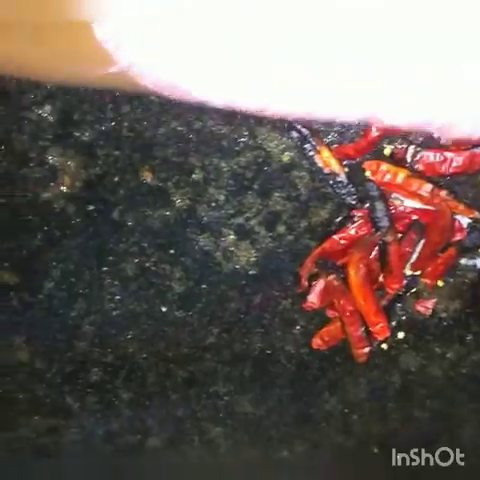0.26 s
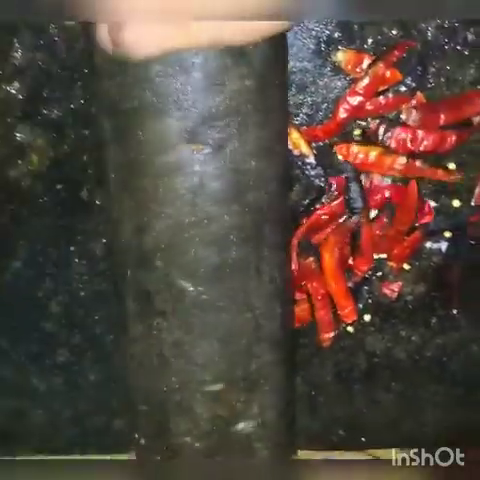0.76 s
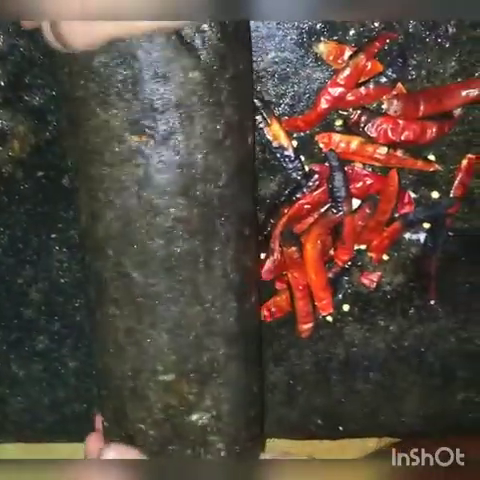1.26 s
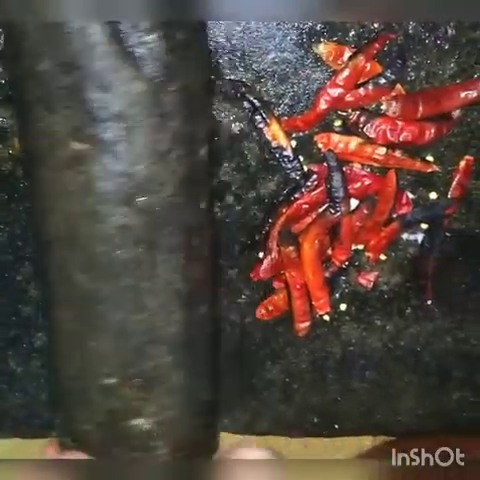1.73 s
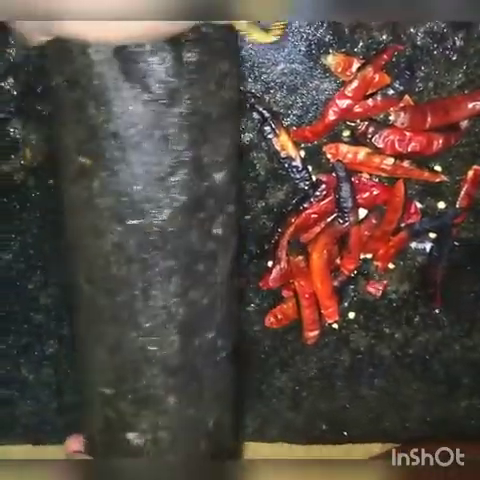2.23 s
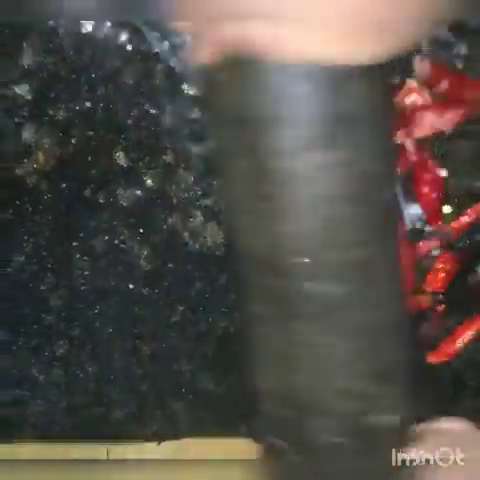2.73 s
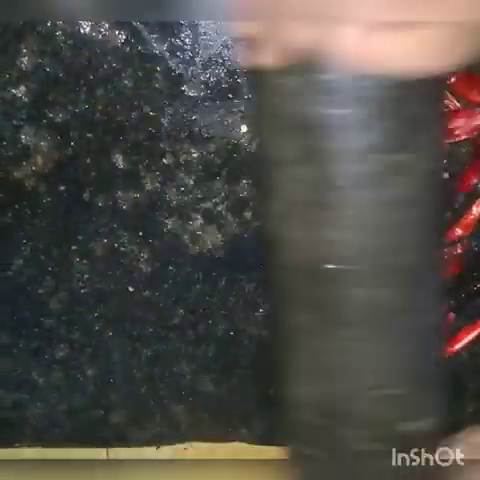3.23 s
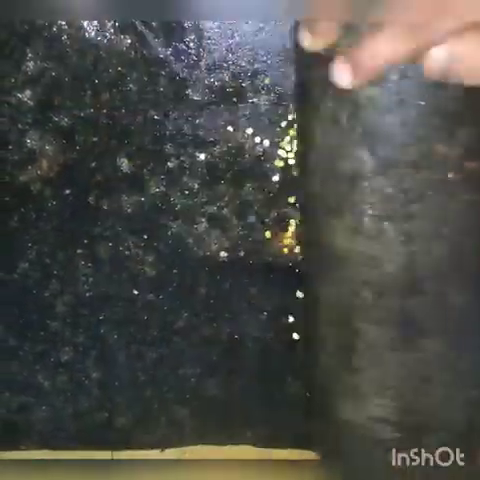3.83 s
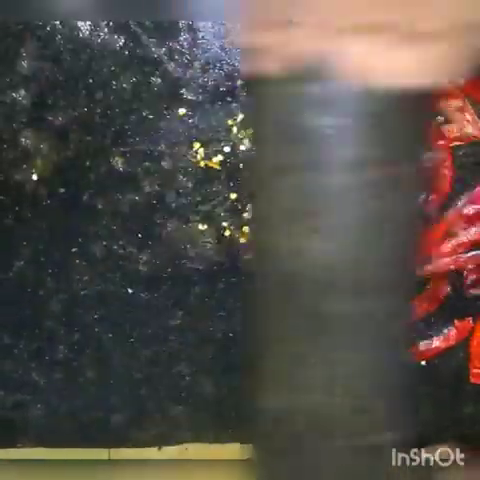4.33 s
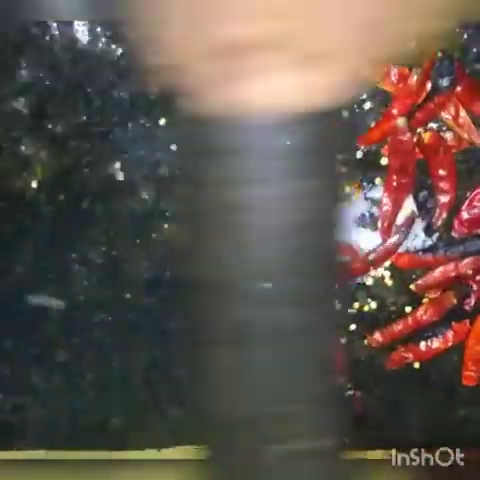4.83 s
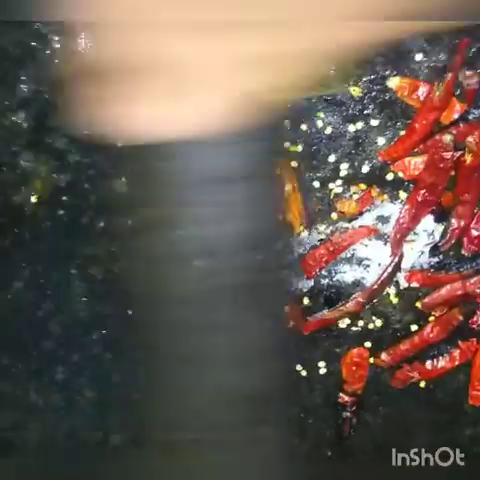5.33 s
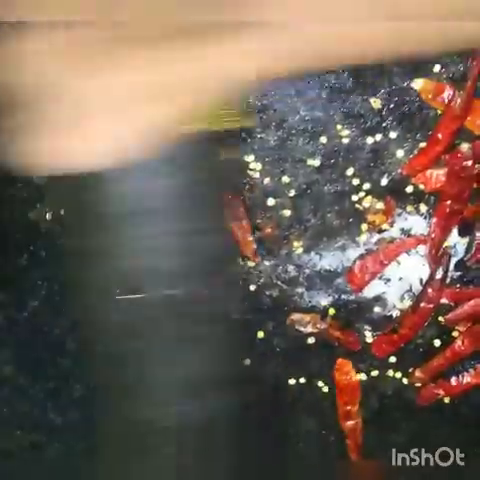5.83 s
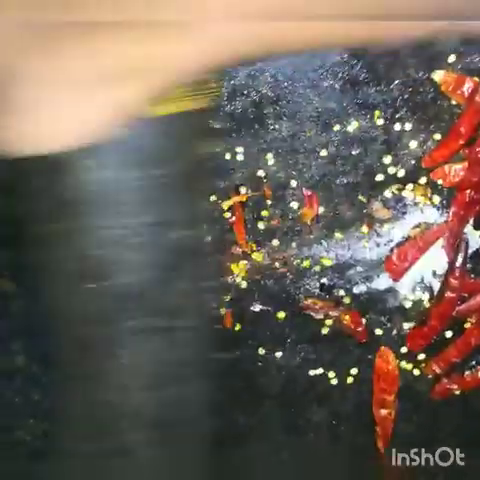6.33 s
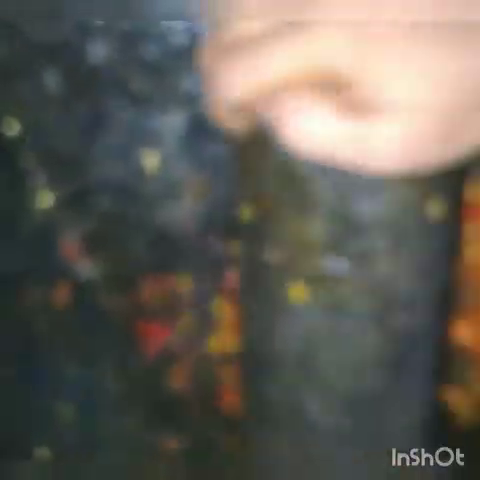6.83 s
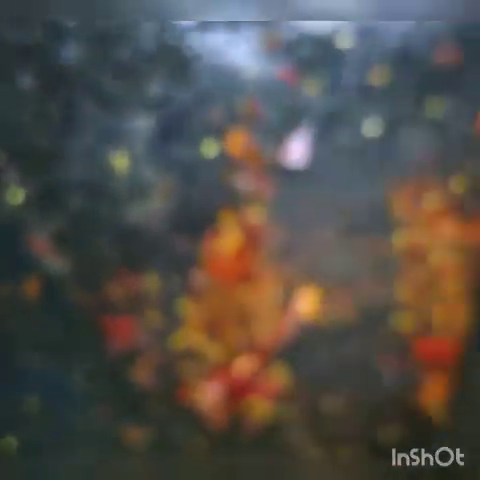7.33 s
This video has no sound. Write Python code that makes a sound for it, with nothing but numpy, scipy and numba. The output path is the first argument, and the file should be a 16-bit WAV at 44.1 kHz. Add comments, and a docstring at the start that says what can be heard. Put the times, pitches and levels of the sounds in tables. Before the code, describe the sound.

Very close stereo microphones in a small kitchen. A stone roller first rattles and rolls lightly on a stone slab, pauses with a few small knocks, then is pushed to and fro over dried chillies: dry crunchy swishes, low rumbles and solid stone knocks about twice a second. Pods snap faintly and a crumb taps on the right. The strokes soften near the end. Crickets trill behind, over quiet room tone.

```python
"""A stone roller is pushed to and fro over dried chillies and salt on a stone slab in a small kitchen.
Close to the two microphones it rumbles (random bumps through a gliding resonance) and knocks (blows through
the modes of slab and stone). Dry swishes of the strokes are coloured noise that swells with their speed.
Pods snap in short noise bursts, stone squeaks faintly, and one crumb taps the right microphone.
Behind them are a quiet room tone and crickets singing outside, made of trilled narrow noise."""
import sys
import numpy as np
from scipy import signal
from scipy.fft import rfft, irfft, next_fast_len
from scipy.io import wavfile
from scipy.ndimage import uniform_filter1d
from numba import njit

SR = 44100
rng = np.random.default_rng(int(sys.argv[2]) if len(sys.argv) > 2 else 0)


def generate_wav(signal):
    """Clip the signal to [-1, 1] and save it as 16-bit WAV at the path in sys.argv[1]."""
    frames = np.transpose(np.atleast_2d(signal))
    scaled = np.clip(frames, -1, 1) * 32767
    pcm = np.round(scaled).astype(np.int16)
    wavfile.write(sys.argv[1], SR, pcm)


N = 334719
TIME = np.arange(N) / SR
RING_TIME = TIME[:SR * 3 // 4]   # long enough for any response
SLOW_TIME = TIME[::64]           # steps of the slow controls


def from_db(db):
    """Decibels to gain."""
    return 10 ** (np.asarray(db) / 20)


def rms_one(x):
    """Scale to rms 1."""
    return x / np.sqrt(np.mean(x ** 2) + 1e-20)


def unit_energy(x):
    """Scale a response so that it passes white noise at the same power."""
    return rms_one(x) / np.sqrt(x.shape[-1])


def at_hz(points, hz):
    """Read a table on a log-frequency axis."""
    f, value = np.transpose(points)
    return np.interp(np.log(hz + 1e-3), np.log(f), value)


def band(x, low_hz, high_hz, order=2):
    """Causal band-pass."""
    sections = signal.butter(order, [low_hz, min(high_hz, .45 * SR)], "band", fs=SR, output="sos")
    return signal.sosfilt(sections, x + 1e-18)


def drift(rate):
    """Slow chance with a spread of about 1, from random knots joined at a rate per second."""
    knots = rng.standard_normal(4000)
    return np.interp(TIME * rate, np.arange(len(knots)), knots)


def at_audio_rate(control):
    """Join the steps of a slow control by straight lines."""
    return np.interp(TIME, SLOW_TIME, control)


def swell(s, length_s):
    """A rounded rise and fall around a moment."""
    return at_audio_rate(np.cos(np.pi * np.clip((SLOW_TIME - s) / length_s, -.5, .5)))


def together(shapes, level_db, floor_db):
    """Gain curve of overlapping moves, each at its own level, over a floor; powers add."""
    moves = np.sum((shapes * from_db(level_db)) ** 2, axis=0)
    return at_audio_rate(np.sqrt(moves + from_db(floor_db) ** 2))


def stereo_noise(gain_at, likeness, size=N):
    """Two channels of noise with a given colour and left-right likeness; rms 1."""
    padded = next_fast_len(size, True)
    hz = np.fft.rfftfreq(padded, 1 / SR)
    mid, side = rfft(rng.standard_normal((2, padded)))
    alike = np.clip(at_hz(likeness, hz), -1, 1)
    both = np.sqrt(1 + alike) * mid + np.sqrt(1 - alike) * side * [[1], [-1]]
    return rms_one(irfft(both * gain_at(hz), padded)[:, :size])


def ring(hz, width_hz, delay=0):
    """A struck resonance that starts after a delay in seconds; the wider, the sooner it dies."""
    t = np.maximum(RING_TIME - delay, 0)
    return np.exp(-np.pi * width_hz * t) * np.sin(2 * np.pi * hz * t)


def play(force, response):
    """Send a force through a stereo response."""
    return signal.oaconvolve(force[None], response, axes=1)[:, :N]


def blows(times, level_db):
    """One impulse for each blow."""
    force = np.zeros(N)
    force[np.round(np.asarray(times) * SR).astype(int)] = from_db(level_db)
    return force


def grains(per_s, spread_db):
    """Random tiny contacts of uneven size; rms 1."""
    sizes = from_db(spread_db * np.minimum(rng.exponential(1, N), 4)) * rng.choice([-1, 1], N)
    return rms_one(sizes * (rng.random(N) < per_s / SR))


# quiet of the kitchen at the microphones: (frequency [Hz], relative level per Hz [dB])
ROOM_SPECTRUM = [(20, -9.5), (40, -18), (60, 1.5), (79, 9.5), (100, 0.5), (125, -4), (150, 2.5),
                 (190, -12.5), (400, -8.5), (800, -16), (1800, -22.5), (4000, -43)]
# likeness of the two microphones for sound from all around: (frequency [Hz], coherence [0-1])
ROOM_COHERENCE = [(30, 0.87), (80, 1), (350, 0.89), (700, 0.6), (1300, 0.17), (2500, .05)]


def room_tone(level_db=-49.5):
    """Steady noise of the room, strongest in the bass and alike there on both sides."""
    return from_db(level_db) * stereo_noise(lambda hz: from_db(at_hz(ROOM_SPECTRUM, hz)), ROOM_COHERENCE)


def narrow_noise(centre_hz, width_hz):
    """Many unrelated voices around one pitch, with steep skirts."""
    def skirts(hz):
        return 1 / (1 + ((hz - centre_hz) / (0.52 * width_hz)) ** 2) ** 1.33
    return stereo_noise(skirts, ROOM_COHERENCE)


# far insect choruses: (pitch [Hz], width [Hz], level before trill and panning [dB], trill rate [1/s])
FAR_CHORUSES = [(2235, 224, -46, 41), (4580, 760, -64.5, 74), (6876, 810, -53.5, 53)]
# bouts of a nearer cricket: (middle of the bout [s], level before trill and panning [dB])
NEAR_BOUTS = [(0.06, -54.5), (0.455, -52), (0.907, -48), (1.196, -50.5), (1.73, -53), (2.06, -52),
              (2.61, -60), (3.525, -52), (4.38, -56), (5.67, -55), (6.135, -54), (6.392, -54),
              (6.66, -55.5), (6.93, -59), (7.31, -54)]
BOUT_S, NEAR_FLOOR_DB = .21, -61


def crickets(chirp_hz=2990, chirp_width_hz=340, syllables_per_s=22, trill_db=1.0):
    """Far choruses trill without pause; a nearer cricket, to the left, sings in bouts over a faint floor."""
    def trill(per_s):
        phase = 2 * np.pi * per_s * TIME + 2 * drift(6.7)
        return from_db(trill_db * np.sin(phase))
    far = sum(from_db(db) * trill(per_s) * narrow_noise(hz, width) for hz, width, db, per_s in FAR_CHORUSES)
    bouts = sum(from_db(db) * swell(s, BOUT_S) for s, db in NEAR_BOUTS)
    near = (bouts + from_db(NEAR_FLOOR_DB)) * trill(syllables_per_s) * narrow_noise(chirp_hz, chirp_width_hz)
    return far * from_db([[.7], [-.7]]) + near * from_db([[2.2], [-2.2]])


# reverberation of the kitchen: (frequency [Hz], time to fall by 60 dB [s])
KITCHEN_DECAY = [(150, 0.56), (400, 0.34), (1000, 0.46), (3000, 0.26)]


def kitchen(build_s=0.0018):
    """Diffuse reflections swell for a few milliseconds, then die away band by band."""
    noise = stereo_noise(np.ones_like, ROOM_COHERENCE, size=len(RING_TIME))
    tail = 0
    for low in 90 * 2. ** np.arange(7):   # octaves
        t60_s = at_hz(KITCHEN_DECAY, low * np.sqrt(2))
        tail = tail + band(noise, low, 2 * low) * from_db(-60 * RING_TIME / t60_s)
    return tail * (1 - np.exp(-RING_TIME / build_s))


# crumb on the right microphone: (time [s], peak level there [dB])
CRUMB_TAPS = [(4.6565, -2.5)]


def crumb(top_hz=3300, low_hz=650):
    """A flying crumb taps the right port: one sharp swing and its rebound, 28 dB weaker on the left."""
    s, peak = np.transpose(CRUMB_TAPS)
    tap = band(signal.unit_impulse(len(RING_TIME)), low_hz, 4000, order=1)
    tap = signal.sosfilt(signal.butter(4, top_hz, fs=SR, output="sos"), tap)
    return play(blows(s, peak), -tap / np.abs(tap).max() * from_db([[-28], [0]]))


# faint slips of the roller, close by: (middle [s], length [s], pitch [Hz], level [dB])
SLIPS = [(7.05, 0.12, 1110, -52.5), (7.04, 0.32, 1520, -59)]


def squeaks(width_hz=110):
    """Stone slipping on stone gives a brief, husky squeak."""
    return sum(from_db(db) * swell(s, length) * narrow_noise(hz, width_hz) for s, length, hz, db in SLIPS)


# pods snapping, close by: (time [s], relative level [dB])
POD_SNAPS = [(2.2544, -29), (2.339, -29), (2.6813, -29.5), (2.9287, -11.5), (3.7724, -34), (6.0794, -34)]


def snaps(decay_s=0.0024, level_db=-6):
    """A brittle pod breaks with a short bright crack."""
    s, strength_db = np.transpose(POD_SNAPS)
    burst = rms_one(band(rng.standard_normal((2, len(RING_TIME))), 5700, 9700))
    return play(blows(s, strength_db + level_db), burst * np.exp(-RING_TIME / decay_s))


# strokes: (fastest moment [s], length [s], relative rub level [dB], fine hiss relative to that [dB])
STROKES = [(0.39, 0.085, -64, 6), (0.562, .1, -66, 4.5), (0.99, .14, -61, -2), (1.498, 0.17, -65, 0),
           (2.145, .1, -40.5, -0.5), (2.259, 0.047, -36, 1), (2.408, 0.15, -41, 0.5),
           (2.851, 0.06, -40, -1), (2.927, 0.053, -42.5, 2.5), (3.036, .11, -39, 0.5),
           (3.422, 0.099, -40, 0.5), (3.618, 0.11, -38.5, 3), (3.944, 0.12, -39.5, -2),
           (4.167, 0.097, -40.5, 3.5), (4.513, 0.11, -41.5, -0.5), (4.703, 0.11, -44.5, 6.5),
           (4.985, 0.069, -56.5, 12.5), (5.065, 0.066, -44.5, 3.5), (5.194, 0.068, -45.5, 3),
           (5.265, 0.055, -44.5, 8), (5.546, 0.069, -51.5, 9), (5.613, 0.075, -45.5, -2),
           (5.795, 0.1, -46, 6.5), (6.043, 0.075, -56, 9.5), (6.25, 0.2, -58.5, 2.5), (6.618, 0.23, -65, 8),
           (7.112, 0.16, -59, 0.5), (7.314, 0.15, -54, 4.5), (7.58, 0.054, -57, 4.5)]
# colours of the rubbing and of its fine hiss: (frequency [Hz], relative level per Hz [dB])
RUB_SPECTRUM = [(500, -14), (1000, -5.5), (1600, 3), (2500, 7), (4000, 3), (6500, -0.5), (9000, -8),
                (12000, -11.5)]
HISS_SPECTRUM = [(5000, -17), (7500, -7.5), (9500, -1.5), (11300, 3), (13000, -2.5), (15800, -7)]
# side the swish leans to: (frequency [Hz], left over right [dB])
SWISH_LEAN = [(1500, 2.5), (4000, 2.2), (9000, -0.3), (11500, -1.5), (14000, -4)]
# likeness of the two microphones for the close swish: (frequency [Hz], coherence [0-1])
CLOSE_COHERENCE = [(200, .95), (1200, 0.13), (3000, 0.037), (12000, 0.016)]
SWELL_STEEPNESS, FADE_STEEPNESS = 2.52, 2.5   # how abruptly a swish comes and goes
RUB_FLOOR_DB, HISS_FLOOR_DB = -64, -64.5      # on the scale of the relative stroke levels


def swish(rub_db=5.0, hiss_db=3.0, flutter_db=1.0, crunch_db=-6, uneven_db=1.0):
    """Dry rubbing swells with the speed of each push and pull, fluttering and crackling a little."""
    def leaning(spectrum):
        def gain_at(hz):
            lean_db = at_hz(SWISH_LEAN, hz) * [[.5], [-.5]]
            return from_db(at_hz(spectrum, hz) + lean_db)
        return stereo_noise(gain_at, CLOSE_COHERENCE)
    s, length, level_db, bright_db = np.transpose(STROKES)[:, :, None]
    steepness = np.where(SLOW_TIME < s, SWELL_STEEPNESS, FADE_STEEPNESS)
    speed = 1 / np.hypot(1, np.abs(2 * (SLOW_TIME - s) / length) ** steepness)
    rub = from_db(rub_db) * together(speed, level_db, RUB_FLOOR_DB)
    hiss = from_db(hiss_db) * together(speed, level_db + bright_db, HISS_FLOOR_DB)
    crunch = rms_one(band(np.array([grains(380, 2.2), grains(450, 2.4)]), 3700, 12700))
    out = rub * leaning(RUB_SPECTRUM) + hiss * (leaning(HISS_SPECTRUM) + from_db(crunch_db) * crunch)
    return out * from_db(flutter_db * drift(130) + uneven_db * drift(35))


# modes of the slab on its counter: (frequency [Hz], width [Hz], relative level [dB])
SLAB_MODES = [(157.2, 2.2, 1), (169.3, 12, -3), (209.8, 1.9, -13), (232.6, 6.6, -11.5), (230.5, 7.3, -1),
              (254, 14.5, 4.5), (283.8, 4.7, 1.5), (287.7, 8.2, 0), (322.3, 8.1, 2), (385.6, 10, 4.5),
              (433, 4, -0.5), (462, 14, -9), (464.6, 11.4, -3), (476.5, 7.7, -4), (547, 12, -23),
              (528.6, 18, -22), (602, 15, -14), (630, 9.2, -11.5), (679, 13, -11.5)]


def slab_response(lag_s=0.00475, heave_hz=255, heave_width_hz=90, modes_db=4, room_db=-2):
    """The heavy slab heaves a moment after the contact and rings low on its counter."""
    heave = unit_energy(band(ring(heave_hz, heave_width_hz, lag_s), 245, 730))
    modes = unit_energy(sum(from_db(db) * width * ring(hz, width, lag_s) for hz, width, db in SLAB_MODES))
    room = unit_energy(band(kitchen(), 164, 580))
    return unit_energy(band(0.5 * heave + from_db(modes_db) * modes + from_db(room_db) * room, 66, 890))


# modes of the roller against the slab: (frequency [Hz], width [Hz], relative level [dB])
STONE_MODES = [(780, 22, -3), (826, 18, -1), (868, 18, -3), (911, 16, 1), (957, 14, -4), (1012, 12, -3),
               (1067, 12, 0), (1121, 12, -2), (1161, 12, 0), (1213, 17, -4), (1351, 12, -1), (1436, 14, 1),
               (1502, 20, -2), (1553, 14, 0), (1697, 24, -5), (1746, 20, -3), (1810, 12, -6),
               (1931, 30, -6), (2001, 14, -8), (2050, 12, -7), (2143, 18, -4), (2274, 19, -6),
               (2358, 20, -7), (2498, 12, -11), (2603, 14, -11), (2719, 21, -15), (2852, 12, -16),
               (2990, 14, -17)]


def stone_response(clack_hz=1080, clack_width_hz=800, modes_db=-2.5, room_db=-4, spread_s=0.003175):
    """Stone on stone: a clack of a few cycles, the pair's modes and the walls' answer."""
    lags_s = [.00022, 0]   # the clack reaches the right microphone first
    clack = np.array([ring(clack_hz, clack_width_hz, lag) for lag in lags_s])
    clack = unit_energy(band(clack, 950, 3800, order=1))
    # each mode reaches the two microphones by a path of its own
    count = len(STONE_MODES)
    paths_s = spread_s * rng.random((count, 1)) + rng.uniform(0, 0.00025, (count, 2))
    modes = sum(from_db(db) * width * ring(hz, width, path[:, None])
                for (hz, width, db), path in zip(STONE_MODES, paths_s))
    room = unit_energy(band(kitchen(), 490, 2240))
    both = clack + from_db(modes_db) * unit_energy(modes) + from_db(room_db) * room
    return unit_energy(both) * from_db([[1.4], [-1.4]])


# knocks of roller on slab; bare stone gives a short contact, pods a long one:
# (time [s], relative strength [dB], contact [s], extra thud [dB])
ROLLER_KNOCKS = [(0.033, -27, 0.0015, 0), (0.119, -27.5, 0.0014, -2), (0.166, -27, 0.0011, -2),
                 (0.181, -29, 0.00081, -8), (0.202, -27.5, 0.0012, 1), (0.287, -25.5, .0012, -7.5),
                 (0.314, -25.5, 0.00093, -2.5), (0.375, -22, .0013, -7.5), (0.83, -36, 0.0016, 1.5),
                 (0.996, -35, 0.0017, -3.5), (1.239, -27, 0.0015, -7), (1.257, -37, 0.0025, 2),
                 (1.562, -21, .0014, -8), (1.657, -30.5, .0014, -4), (1.733, -26.5, 0.0014, -10),
                 (2.531, -18.5, 0.00097, 3), (3.129, -18, 0.00048, 2.5), (3.711, -19.5, .00078, 2),
                 (4.218, -18.5, 0.0011, 0.5), (4.459, -25, 0.0011, 0), (4.768, -19.5, 0.0012, -4),
                 (4.983, -29, 0.0038, 5.5), (5.019, -28.5, 0.0032, 7.5), (5.298, -18.5, 0.00074, 2.5),
                 (5.446, -32, .0012, 0.5), (5.56, -30.5, 0.0032, 7), (5.886, -32, .0012, -5),
                 (5.942, -23.5, 0.00086, 3), (5.984, -24, .0012, 2.5), (6.848, -25.5, 0.0021, 4.5)]
# a knock with a shorter contact than this rebounds at once, weaker and softer
HARD_CONTACT_S, REBOUND_S, REBOUND_LOSS_DB, REBOUND_SOFTENING = .0007, 0.0076, 7.5, 1.5
# after the heaviest knock the roller rocks to rest in a run of weaker touches
ROCK_START_S, ROCK_GAP_S, ROCK_DB, ROCK_LOSS_DB, ROCK_CONTACT_S = 3.168, .0226, -26.5, 1.7, 0.00065


def contacts(count=4):
    """Every blow of stone on stone: the knocks, their rebounds and the rocking."""
    rebounds = [(s + REBOUND_S, db - REBOUND_LOSS_DB, contact * REBOUND_SOFTENING, thud)
                for s, db, contact, thud in ROLLER_KNOCKS if contact < HARD_CONTACT_S]
    rocking = [(ROCK_START_S + k * ROCK_GAP_S, ROCK_DB - k * ROCK_LOSS_DB, ROCK_CONTACT_S, 2.5)
               for k in range(count)]
    return ROLLER_KNOCKS + rebounds + rocking


# thin ringing of the roller; knocks use the pitch alone: (pitch [Hz], width [Hz], level relative to grit [dB])
ROLLER_RINGING = [(4220, 79, -18.5), (4480, 200, -22)]
CONTACT_LOSS_DB, CONTACT_STEEPNESS = 2.5, 4.04   # loss at the frequency 1 / contact, and the power it grows by


def knocks(slab, stone, thud_db=27, body_db=27, clack_db=30.5, edge_db=29, crack_db=27, singing_db=-34):
    """The roller drops onto the slab; pods cushion some blows, bare stone gives others a hard edge."""
    s, strength_db, contact_s, thud = np.transpose(contacts())

    def force(hz, db):
        """The shorter the contact, the further up the blow reaches."""
        loss_db = CONTACT_LOSS_DB * np.abs(hz * contact_s) ** CONTACT_STEEPNESS
        return blows(s, strength_db + db - np.minimum(loss_db, 80))
    out = play(force(200, thud + thud_db), unit_energy(band(slab, 160, 249.4)))
    out += play(force(383, body_db), unit_energy(band(slab, 341, 690)))
    out += play(force(1057, clack_db), unit_energy(band(stone, 697, 1510)))
    out += play(force(1450, edge_db), unit_energy(band(stone, 1197, 2000)))
    out += play(force(2160, crack_db), unit_energy(band(stone, 2450, 3000, order=3)))
    singing = sum(ring(hz, 5.0) for hz, _, _ in ROLLER_RINGING)
    return out + play(force(2000, singing_db), singing[None])


# quick rolls over bare stone:
# (start [s], length [s], first pitch [Hz], last pitch [Hz], relative rumble [dB], relative grit [dB])
QUICK_ROLLS = [(0.0, 0.23, 288, 267, -25, -34.5), (0.292, 0.12, 332, 397, -27.5, -38.5),
               (1.258, 0.025, 352, 347, -29, -60), (1.33, 0.14, 400, 420, -44, -64),
               (1.651, 0.059, 485, 450, -32, -46), (1.833, 0.14, 436, 378, -36.5, -49),
               (1.971, .14, 332, 327, -34, -44), (2.746, 0.041, 510, 413, -28, -36),
               (3.294, 0.036, 455, 393, -29.5, -37), (3.836, 0.099, 564, 310, -28.5, -37),
               (4.387, 0.06, 490, 365, -30.5, -41), (4.912, 0.034, 507, 412, -31.5, -41.5),
               (5.458, 0.021, 500, 468, -31.5, -41), (5.96, 0.037, 280, 295, -40, -47),
               (7.01, 0.18, 373, 333, -46, -71)]
# slow crawls over the pods: (start [s], length [s], relative rumble [dB])
SLOW_CRAWLS = [(2.48, 0.054, -39.5), (2.71, .08, -44), (3.02, 0.12, -47), (3.614, 0.2, -38),
               (3.895, 0.044, -38), (4.14, 0.075, -39), (4.479, 0.039, -32.5), (4.671, 0.091, -34),
               (4.988, 0.065, -33), (5.195, 0.14, -33.5), (5.502, 0.1, -36), (5.73, 0.11, -31.5),
               (6.181, 0.027, -47.5), (6.57, 0.058, -46), (7.11, 0.029, -42), (7.248, 0.065, -40.5)]
# the pods brake the roller and muffle its grit, given relative to the rumble
CRAWL_FIRST_HZ, CRAWL_LAST_HZ, CRAWL_GRIT_DB = 223, 178, -19.5
ROLL_ATTACK_S, ROLL_RELEASE_S = 0.022, .034
RESTING_DB, RESTING_GRIT_DB = -64, -75   # floors, as the roller shifts under the hands between moves


def roller_motion():
    """Each move sets in, holds and dies away while its pitch glides: pitch, rumble gain, grit gain."""
    crawls = [(s, length, CRAWL_FIRST_HZ, CRAWL_LAST_HZ, db, db + CRAWL_GRIT_DB)
              for s, length, db in SLOW_CRAWLS]
    start, length, first_hz, last_hz, rumble_db, grit_db = np.transpose(QUICK_ROLLS + crawls)[:, :, None]
    age = SLOW_TIME - start
    attack = np.minimum(age / ROLL_ATTACK_S, 0)
    release = np.maximum((age - length) / ROLL_RELEASE_S, 0)
    shapes = np.exp(np.maximum(attack - release, -20))
    glides = first_hz * (last_hz / first_hz) ** np.clip(age / length, 0, 1)
    # the loudest move at each moment sways the pitch most
    pitch_hz = np.average(glides, axis=0, weights=(shapes * from_db(rumble_db)) ** 2)
    rumble = together(shapes, rumble_db, RESTING_DB)
    return at_audio_rate(pitch_hz), rumble, together(shapes, grit_db, RESTING_GRIT_DB)


@njit
def moving_resonance(x, centre, damping):
    """Band-pass whose centre (cycles per sample) moves from sample to sample."""
    out, low, mid = np.zeros(len(x)), 0.0, 0.0
    for i in range(len(x)):
        step = 2 * np.pi * centre[i]
        low += step * mid
        mid += step * (x[i] - low - damping * mid)
        out[i] = mid
    return out


def evened(x, window_s=0.0252):
    """Even out the short-term level of the bumps to about rms 1, so that the rumble runs smoothly."""
    power = uniform_filter1d(x ** 2, int(window_s * SR))
    return x / np.sqrt(np.abs(power) + 1e-12)


def rolling(slab, stone, damping=0.45, rumble_db=-4.0, slab_db=-19, room_db=-25, grit_db=-3,
            heavy_hz=149, heavy_db=-5.0, fast_share=0.21):
    """The rough roller bumps over the slab, and the rumble rises in pitch with its speed."""
    centre_hz, level, grit = roller_motion()
    bumps = moving_resonance(grains(1500, 1.6), centre_hz / SR, damping)
    bumps = moving_resonance(bumps, centre_hz / SR, damping * 2)
    rumble = from_db(rumble_db) * level * evened(band(bumps, 128, 1200))
    # the roller rocks the slab on its lowest mode, most of all when it crawls over pods
    crawl = np.clip((300 - centre_hz) / 100, fast_share, 1)
    rocking = evened(band(grains(400, 2.4), 0.843 * heavy_hz, 1.12 * heavy_hz))
    rumble += from_db(heavy_db) * level * crawl * rocking
    walls = unit_energy(band(kitchen(), 180, 670))
    out = rumble * from_db([[.5], [-.5]])
    out += from_db(slab_db) * play(rumble, slab)
    out += from_db(room_db) * play(rumble, walls)
    # grit caught between the stones ticks, and sets the roller singing
    out += from_db(grit_db) * play(grit * grains(400, 4.5), unit_energy(band(stone, 530, 1540)))
    return out + grit * sum(from_db(db) * narrow_noise(hz, width) for hz, width, db in ROLLER_RINGING)


def scene():
    """Grinding close by, over the quiet of the kitchen and the crickets outside."""
    slab = slab_response() * from_db([[.4], [-.4]])
    stone = stone_response()
    background = room_tone() + crickets()
    small_sounds = crumb() + squeaks() + snaps()
    return background + small_sounds + swish() + knocks(slab, stone) + rolling(slab, stone)


def record(dry, notch_hz=8100, notch_width_hz=1700, cutoff_hz=15900):
    """The microphone ports swallow a band in the treble; the top is cut."""
    ported = signal.lfilter(*signal.iirnotch(notch_hz, notch_hz / notch_width_hz, fs=SR), dry)
    return signal.sosfilt(signal.ellip(10, .2, 80, cutoff_hz, fs=SR, output="sos"), ported)


dry = scene()
out = record(dry)
generate_wav(out)
```